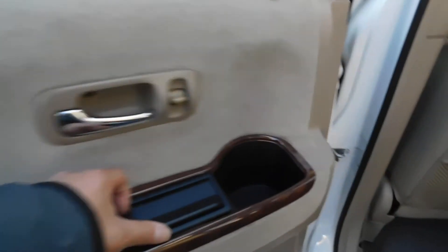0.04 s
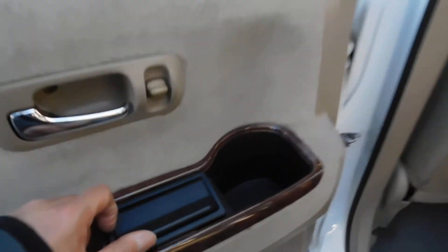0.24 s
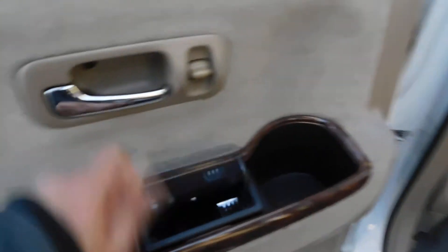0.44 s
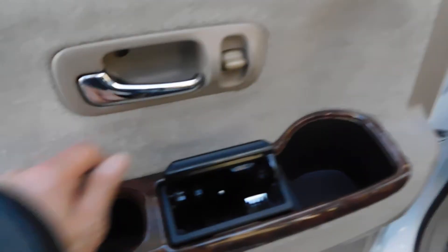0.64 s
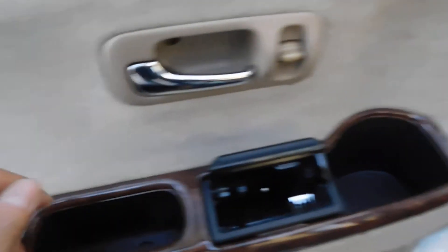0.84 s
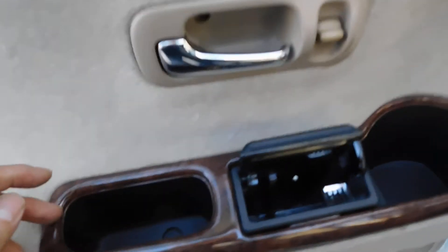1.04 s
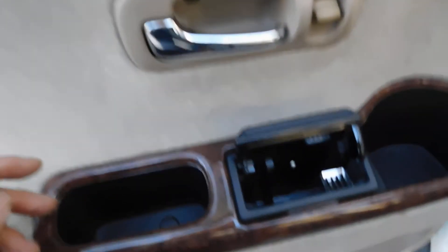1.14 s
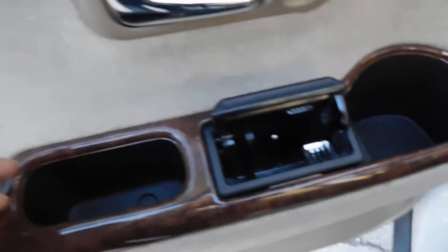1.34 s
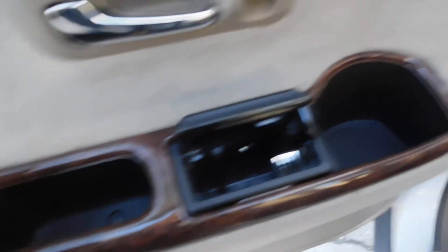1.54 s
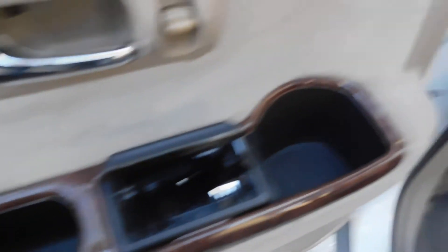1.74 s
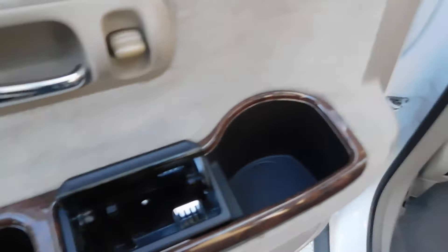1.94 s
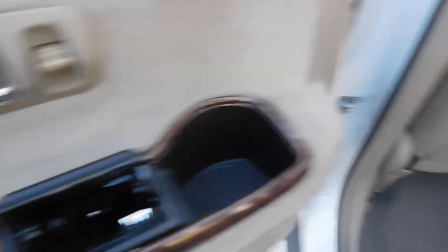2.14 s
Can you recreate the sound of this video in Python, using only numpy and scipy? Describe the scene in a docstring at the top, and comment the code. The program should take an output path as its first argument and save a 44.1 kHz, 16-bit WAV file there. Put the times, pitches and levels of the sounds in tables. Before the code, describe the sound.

A plastic lid in a car door armrest snaps open with a sharp clack and a brief hollow thud. Light finger ticks come before and after, with a soft sleeve rustle, heard close over a faint low rumble.

```python
"""Armrest lid in a parked car

Fingers tap and scrape on a plastic compartment lid in the door armrest. The lid snaps open against its
stop and rebounds: each impact excites its damped modes, and the door panel booms briefly. A sleeve slides
away with a hiss of friction and a few more ticks follow, over a low rumble and the dull outside wash."""
import sys
import numpy as np
from scipy import signal
from scipy.fft import rfft, irfft
from scipy.io import wavfile
from scipy.ndimage import uniform_filter1d

SR = 44100
rng = np.random.default_rng(int(sys.argv[2]) if len(sys.argv) > 2 else 0)


def waveform_to_disk(signal):
    """Save audio, clipped to [-1, 1], as 16-bit WAV at the path in sys.argv[1]."""
    frames = np.transpose(np.atleast_2d(signal))
    scaled = np.clip(frames, -1, 1) * 32767
    samples = np.round(scaled).astype(np.int16)
    wavfile.write(sys.argv[1], SR, samples)


N = 97020


def amp(db):
    """Decibels to amplitude ratio."""
    return 10 ** (np.asarray(db) / 20)


def unit(x):
    """Normalisation to rms 1."""
    return x / np.sqrt(np.mean(x ** 2) + 1e-20)


def decay(t, t60):
    """Exponential damping: 60 dB down after t60 seconds."""
    return np.exp(-np.log(1000) * t / t60)


def at_hz(points, hz):
    """Interpolation on a log-frequency axis."""
    f, value = np.transpose(points)
    return np.interp(np.log(hz + 1), np.log(f + 1), value)


def envelope(points):
    """Gain over time from (time_s, level_db) points."""
    return amp(np.interp(np.arange(N) / SR, *np.transpose(points)))


def add(mix, start_s, sound):
    """Superposition of a delayed sound on the mix."""
    part = mix[:, max(round(start_s * SR), 0):][:, :sound.shape[-1]]
    part += sound[..., :part.shape[-1]]


def colour(x, spectrum, width):
    """Spectral shaping of a mid and side pair; the mid comes out at rms 1."""
    hz = np.fft.rfftfreq(x.shape[1], 1 / SR)
    mid_side = np.array([np.ones(len(hz)), amp(at_hz(width, hz))])
    y = irfft(rfft(x) * amp(at_hz(spectrum, hz)) * mid_side, x.shape[1])
    return y / y[0].std()


# Lid striking its stop, chattering and rebounding:
# start_s, level_db, bass_db, treble_db, contact_s, ring_db, three spot_hz (modes of the struck spot)
LID_SNAPS = [(.4906, 19, -7, 1.5, 0.006, -6, 2250, 3767, 4290),
             (.4945, 9.5, 1.5, -8, 0.0019, -0.5, 1147, 1507, 1820),
             (.5055, 6.5, -13, -6, 0.0058, -4.5, 1840, 2280, 4500),
             (.514, 5.5, -5, -25, 0.0036, 4.5, 1690, 1850, 2220),
             (.5172, 11, -5.5, -5.5, 0.0054, 2.5, 841, 2450, 3340),
             (.532, -4.5, 3.5, -5.5, 0.0053, 9, 1870, 2500, 3200)]
# Ticks of fingers and plastic trim: same columns
SMALL_TICKS = [(.0866, -1.5, -19, 2, 0.0023, -3, 2030, 2480, 4940),
               (.2002, -3, 0, 5, 0.0036, -3, 1180, 2340, 2730),
               (.2058, -1.5, -5.5, -9, 0.0039, 2, 1143, 1495, 2200),
               (.2945, -5, -2, 1, 0.00099, -2.5, 633, 814, 2750),
               (.3903, -2, -0.5, 2.5, 0.0054, 3, 1136, 2770, 4200),
               (.4555, -7.5, 8.5, 2, 0.004, -1.5, 720, 1140, 3440),
               (.478, -4, 1.5, -4, 0.0076, 1, 1140, 1850, 2520),
               (.6325, -13.5, 1, 12, 0.0026, -8, 2880, 3740, 5880),
               (.877, -6.5, -2, -12, 0.0032, 2, 887, 1540, 2230),
               (.9616, -2.5, -4, -2.5, 0.0032, -2, 1132, 1677, 2150),
               (2.1116, -18, 4, 8.5, .0026, -23, 2520, 3720, 5800)]


def lid():
    """Impact and rebound: the snap is a rapid train of collisions, with lighter ticks around it."""
    out = np.zeros((2, N))
    for start_s, *blow in list(LID_SNAPS) + list(SMALL_TICKS):
        add(out, start_s, impact(*blow))
    return out


# Spectrum of a contact on plastic: frequency_hz, level_db
PLASTIC_SPECTRUM = [(60, -13), (150, 6.5), (340, 3.5), (460, -2), (600, 0), (1000, -3.5), (1700, -1),
                    (2500, -2.5), (3100, -11), (4200, -10), (4900, -20.5), (6500, -17), (9000, -25.5),
                    (12000, -23.5), (16000, -36)]
# Modes of the lid and its box: pitch_hz, level_db, t60_s
LID_MODES = [(576, 0, 0.014), (806, 8, 0.031), (1170, -6, 0.02), (1500, -5, 0.03), (1667, 1.5, 0.039),
             (1866, -2, .085), (2258, -7, 0.12), (2690, 3, 0.02), (4060, -14, .04), (5650, -8, 0.018),
             (7080, -12.5, .022)]
# Reverberation time of the cabin: frequency_hz, t60_s
CABIN_T60 = [(140, .45), (500, .14), (2000, .085), (12000, .08)]
# Reverberant-to-direct ratio: frequency_hz, ratio_db
CABIN_RATIO = [(120, -7), (500, -2.5), (2000, -6), (12000, -7.5)]
# Stereo width of nearby sources: frequency_hz, side_to_mid_db
NEAR_WIDTH = [(120, -37), (350, -40), (700, -13), (1700, -11.5), (2600, -3.5), (4200, -0.5), (6500, -0.5)]
RISE_S, RISE_CYCLES, RELEASE_T60_S = 0.00014, 0.64, 0.0096
BASS_HZ, MID_HZ, TREBLE_HZ = 420, 1700, 5950
SPOT_DB, SPOT_DB_PER_OCTAVE, SPOT_T60_S = 11.5, -5, 0.024


def impact(level_db, bass_db, treble_db, contact_s, ring_db, *spot_hz, size=16384, bands=26):
    """Impulsive excitation: a broadband burst, its cabin reverberation and freely decaying modes."""
    t, hz = np.arange(size) / SR, np.fft.rfftfreq(size, 1 / SR)
    tilt = [(BASS_HZ, bass_db), (MID_HZ, 0), (TREBLE_HZ, treble_db)]
    centres = np.geomspace(60, 17000, bands)
    out = np.zeros((2, size))
    for f, selector in zip(centres, np.eye(bands)):
        passband = np.interp(hz, centres, selector, left=0, right=0)
        direct, reverb = irfft(rfft(rng.standard_normal((2, 2, size))) * np.sqrt(passband))
        # Low bands build up and die away more slowly.
        rise = 1 - np.exp(-(t / (RISE_S + RISE_CYCLES / f)) ** 2)
        direct *= rise * decay(np.maximum(t - contact_s, 0), RELEASE_T60_S + 4 / f)
        reverb *= rise * np.minimum(t / contact_s, 1) * decay(t, at_hz(CABIN_T60, f))
        band = np.array([unit(d) + amp(at_hz(CABIN_RATIO, f)) * unit(r) for d, r in zip(direct, reverb)])
        gain = np.sqrt(passband.mean() / size) * amp(at_hz(PLASTIC_SPECTRUM, f) + at_hz(tilt, f))
        out += band * gain * amp([[0], [at_hz(NEAR_WIDTH, f)]])
    spot_modes = [(f, SPOT_DB + SPOT_DB_PER_OCTAVE * np.log2(f / MID_HZ), SPOT_T60_S) for f in spot_hz]
    for f, db, t60 in list(LID_MODES) + spot_modes:
        phase = 2 * np.pi * (f * t + rng.random())
        ring = np.array([np.sin(phase), rng.choice([-1, 1]) * np.cos(phase)])
        ring *= np.minimum(2 * t / contact_s, 1) * decay(t, t60)
        # Scaling by the damping keeps the spectral peak nearly independent of t60.
        damping = np.log(1000) / t60
        gain = 2 * damping / SR * amp(db + ring_db + at_hz(tilt, f))
        out += ring * gain * amp([[0], [at_hz(NEAR_WIDTH, f)]])
    return amp(level_db) * out


# Modes of the door panel: pitch_hz, level_db, t60_s
DOOR_MODES = [(79.8, -37.5, 0.87), (112.2, -24, 0.26), (160.4, -13.5, 0.075), (186.2, -24, 0.25),
              (230, -18.5, 0.068), (334, -22.5, 0.13)]
BOOM_START_S, BOOM_RISE_S = 0.5045, 0.0029
BUMP_HZ, BUMP_DB, BUMP_T60_S = 337, -29, 0.055


def door():
    """Free vibration of a panel: it hums under a soft bump of the hand, then booms under the snap."""
    out, t = np.zeros((2, N)), np.arange(SR) / SR
    mid = out[:1]
    add(mid, 0, amp(BUMP_DB) * decay(t, BUMP_T60_S) * np.sin(2 * np.pi * BUMP_HZ * t))
    rise = np.minimum(t / BOOM_RISE_S, 1)
    for hz, db, t60 in DOOR_MODES:
        add(mid, BOOM_START_S, amp(db) * rise * decay(t, t60) * np.sin(2 * np.pi * hz * t))
    return out


# Fingertip strokes on the lid: start_s, length_s, level_db
SCRAPE_STROKES = [(0.086, 0.035, -48.5), (0.293, 0.048, -38)]
# Spectrum of the scraped plastic: frequency_hz, level_db
SCRAPE_SPECTRUM = [(100, -14), (450, -12), (680, 1.5), (1400, -8), (1670, 2.5), (2000, -4.5), (2750, -4),
                   (3300, -12.5), (8000, -15.5), (16000, -28.5)]
SCRAPE_RISE_S, SCRAPE_FALL_S, SLIPS_PER_S, SLIP_SPREAD_DB = 0.0071, 0.015, 1800, 1


def scrapes():
    """Stick-slip friction: a fingertip drives the plastic with dense, tiny, random impulses."""
    t = np.arange(N) / SR
    slips = (rng.random((2, N)) < SLIPS_PER_S / SR) * rng.choice([-1, 1], (2, N))
    strength = amp(SLIP_SPREAD_DB * np.minimum(rng.exponential(1, (2, N)), 3))
    push = np.zeros(N)
    for start_s, length_s, db in SCRAPE_STROKES:
        rise = np.clip((t - start_s) / SCRAPE_RISE_S, 0, 1)
        fall = np.exp(-np.maximum(t - start_s - length_s, 0) / SCRAPE_FALL_S)
        push += amp(db) * rise * fall
    return push * colour(slips * strength, SCRAPE_SPECTRUM, NEAR_WIDTH)


# Sleeve rubbing as the arm moves: time_s, level_db
SLEEVE_LEVEL = [(0, -45.5), (.06, -56.5), (.17, -54), (.25, -58), (.37, -55), (.42, -56), (.47, -44),
                (.56, -55.5), (.66, -54), (.79, -51), (.88, -57), (1.0, -67), (1.5, -67.5), (2.02, -65),
                (2.2, -57.5)]
# Spectrum of the cloth: frequency_hz, level_db
SLEEVE_SPECTRUM = [(200, 0.5), (900, 3), (1700, 2.5), (2150, -1), (2550, 0.5), (3300, -3), (4300, -10),
                   (5200, -11.5), (9000, -12), (16000, -17.5)]


def sleeve(flutter_db=0.47, smoothing_samples=500):
    """Friction noise: sliding cloth gives a soft, slightly uneven hiss."""
    flutter = amp(flutter_db * unit(uniform_filter1d(rng.standard_normal(N), smoothing_samples)))
    hiss = colour(rng.standard_normal((2, N)), SLEEVE_SPECTRUM, NEAR_WIDTH)
    return envelope(SLEEVE_LEVEL) * flutter * hiss


# Resonances of a rub on the trim: pitch_hz, half_width_hz, level_db
RUB_PEAKS = [(2540, 160, -61.5), (4200, 370, -73)]
RUB_START_S, RUB_RISE_S = 2.045, 0.068


def trim_rub():
    """Narrowband friction noise: something rubs on the trim with a faint, fuzzy whistle."""
    hz, t = np.fft.rfftfreq(N, 1 / SR), np.arange(N) / SR
    noise = rfft(rng.standard_normal((2, N)))
    whistle = np.zeros((2, N))
    for pitch_hz, half_width_hz, db in RUB_PEAKS:
        resonance = 1 / (1 + ((hz - pitch_hz) / half_width_hz) ** 2)
        whistle += amp(db) * unit(irfft(noise * resonance, N))
    return whistle * np.clip((t - RUB_START_S) / RUB_RISE_S, 0, 1)


# Spectrum of the wash from outside: frequency_hz, density_db
WASH_SPECTRUM = [(12, -40), (20, -13.5), (49, -4.5), (93, -14), (127, -7), (154, -16), (248, -13),
                 (460, -18), (949, -14.5), (1330, -23.5), (1590, -21), (4060, -47.5), (11400, -63.5),
                 (16000, -60)]
# Swells and dips of the rumble: time_s, level_db
RUMBLE_LEVEL = [(0, -64), (.2, -47), (.45, -50.5), (.87, -51), (1.02, -51), (1.15, -49), (1.38, -47.5),
                (1.48, -57), (1.66, -73), (1.76, -46), (1.85, -71), (2.2, -57.5)]
# Spectrum of the rumble: frequency_hz, density_db
RUMBLE_SPECTRUM = [(20, -48), (45, 3), (70, -4.5), (110, -12.5), (500, -57)]
# Stereo width of the background: frequency_hz, side_to_mid_db
AMBIENT_WIDTH = [(60, -45), (150, -31.5), (380, -12), (950, -8), (2380, 2), (5980, 4), (15000, 0)]
WASH_DB = -47.5


def background():
    """Ambient noise: a stationary dull wash and a slowly amplitude-modulated rumble."""
    wash = colour(rng.standard_normal((2, N)), WASH_SPECTRUM, AMBIENT_WIDTH)
    rumble = colour(rng.standard_normal((2, N)), RUMBLE_SPECTRUM, AMBIENT_WIDTH)
    return amp(WASH_DB) * wash + envelope(RUMBLE_LEVEL) * rumble


def left_right(pair):
    """Sum and difference turn mid and side into left and right."""
    return np.array([pair[0] + pair[1], pair[0] - pair[1]])


def scene(pan_db=0.7):
    """Amplitude panning: the lid lies slightly to the right, everything else around the centre."""
    plastic = left_right(lid() + scrapes()) * amp([[-pan_db], [pan_db]])
    return plastic + left_right(door() + sleeve() + trim_rub() + background())


def record(dry, cutoff_hz=16100):
    """Band limiting by a steep linear-phase low-pass filter."""
    lowpass = signal.firwin(511, cutoff_hz, window=("kaiser", 9), fs=SR)
    return signal.oaconvolve(dry, lowpass[None], "same")


dry = scene()
out = record(dry)
waveform_to_disk(out)
```